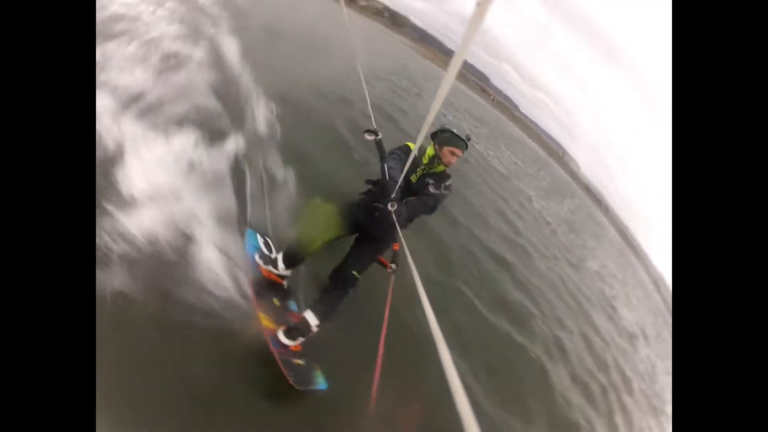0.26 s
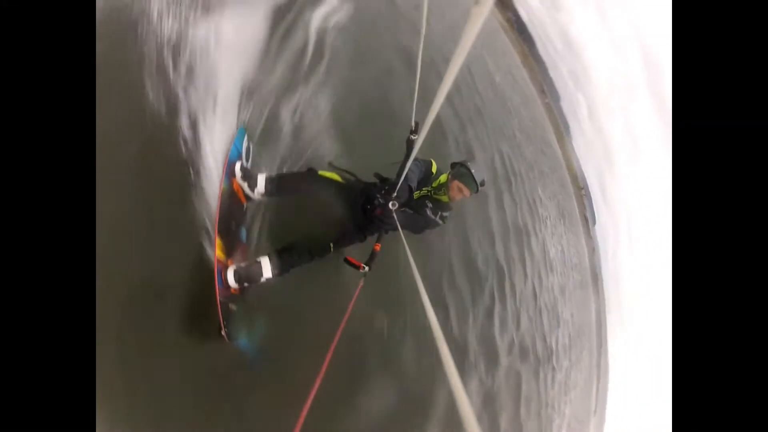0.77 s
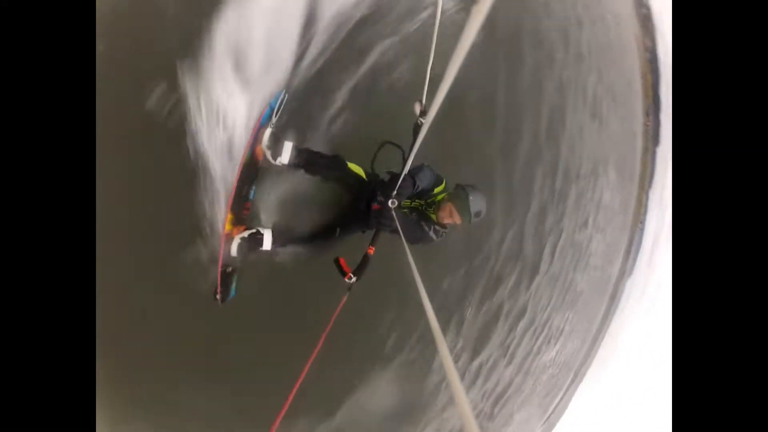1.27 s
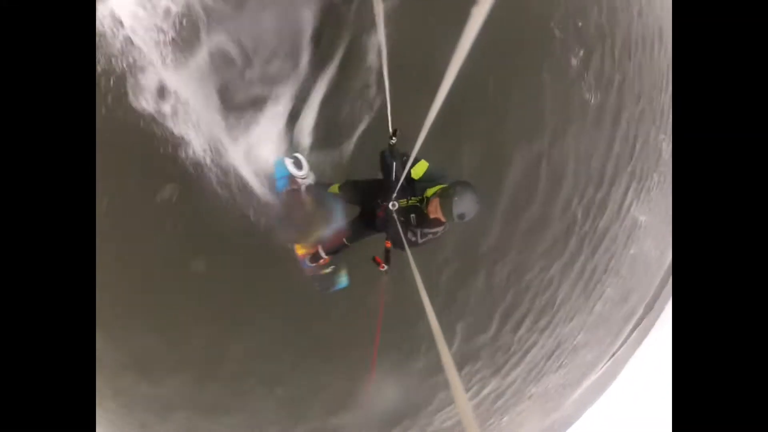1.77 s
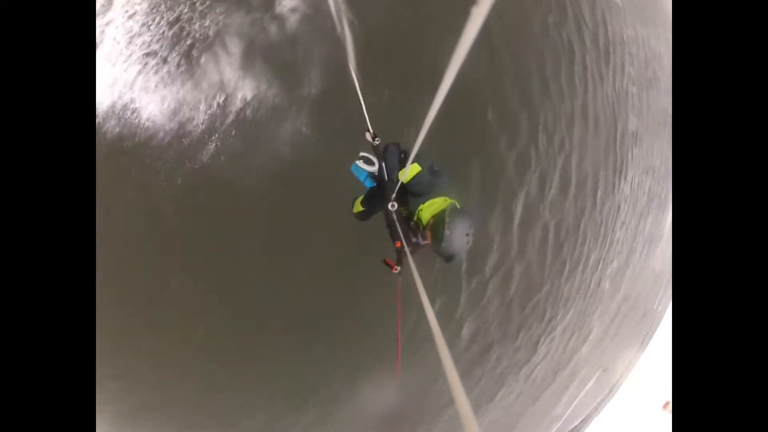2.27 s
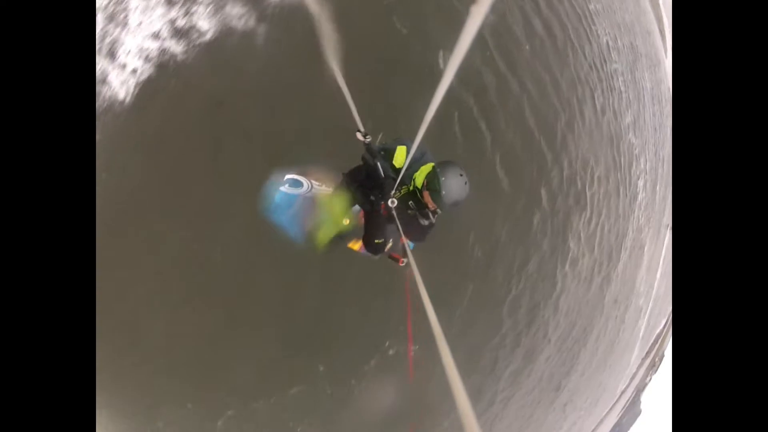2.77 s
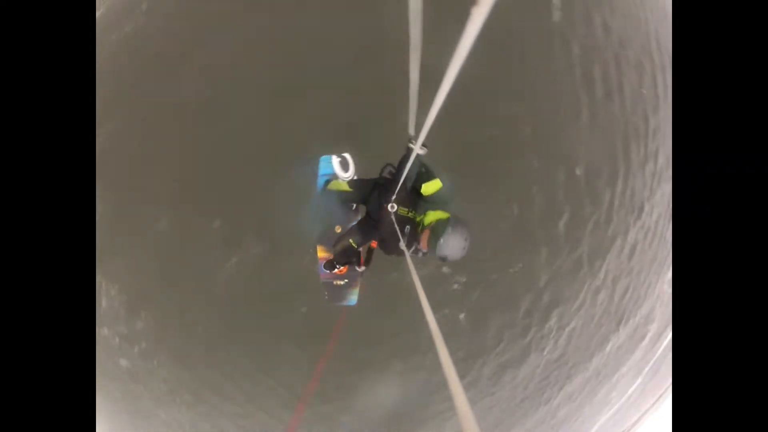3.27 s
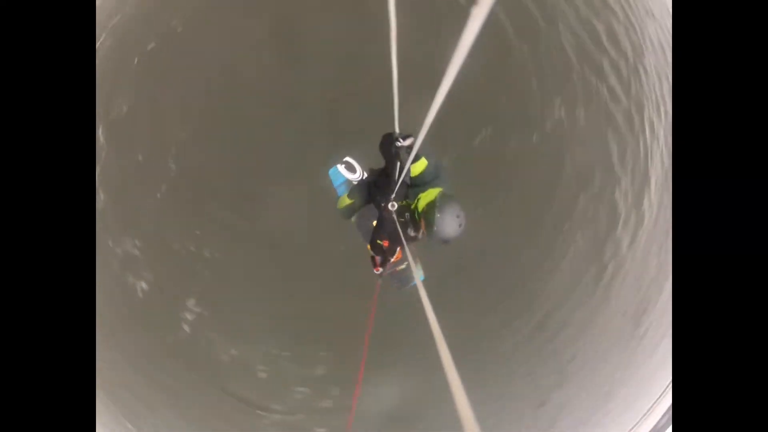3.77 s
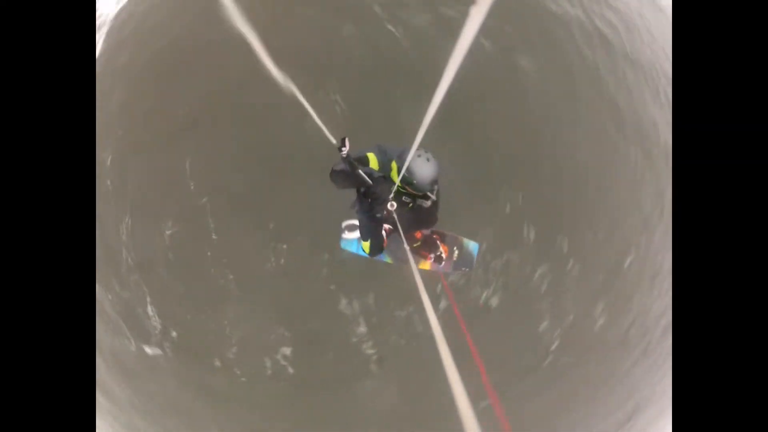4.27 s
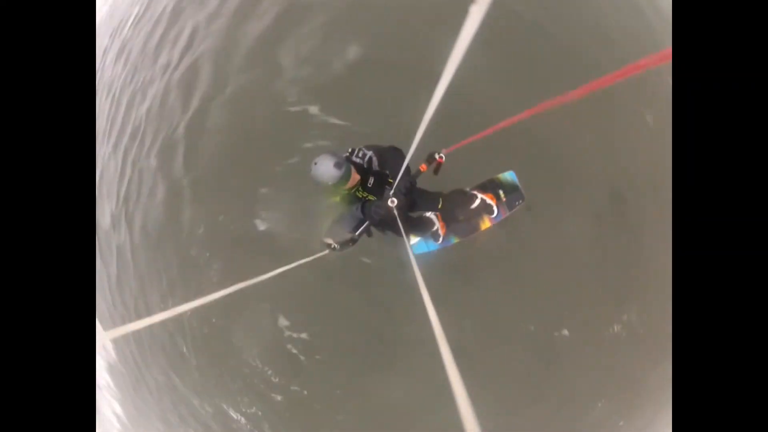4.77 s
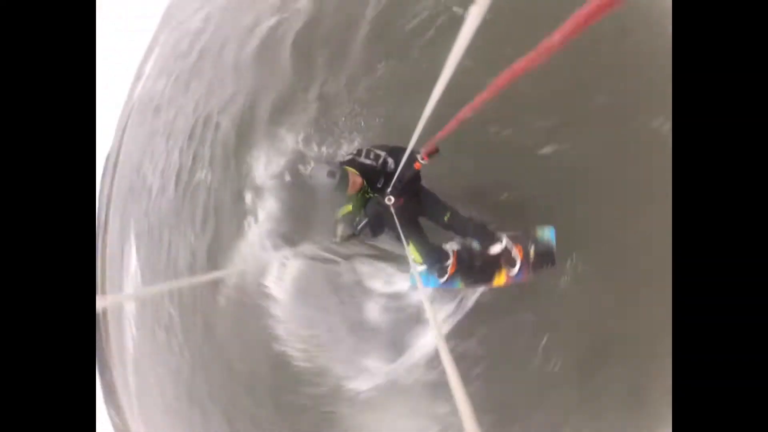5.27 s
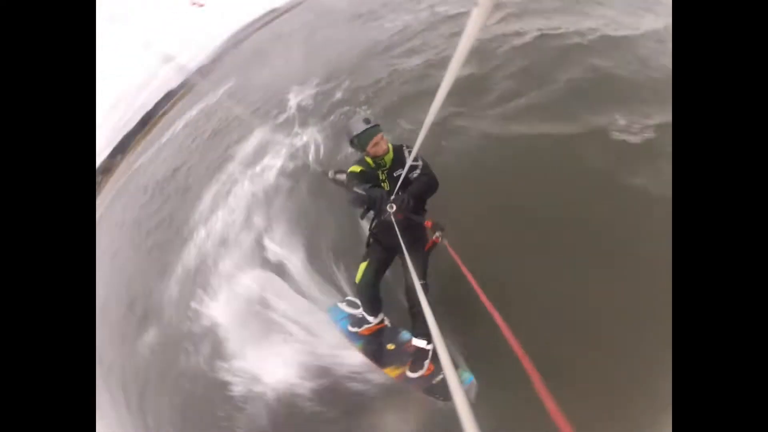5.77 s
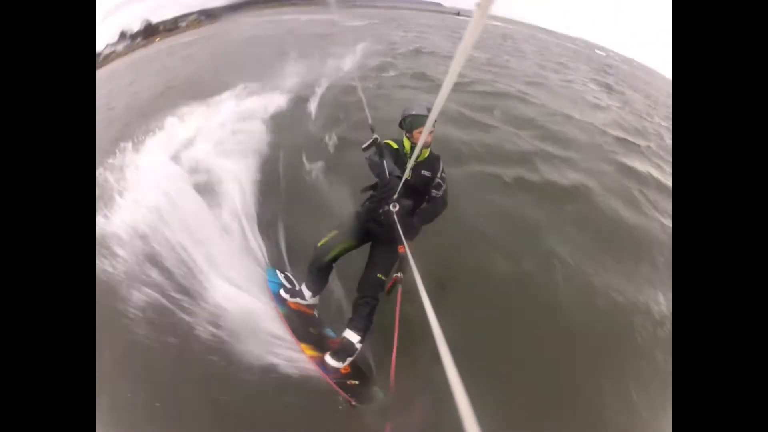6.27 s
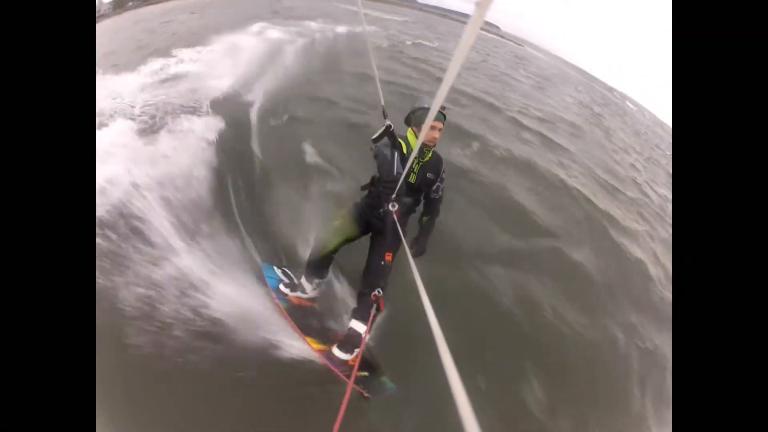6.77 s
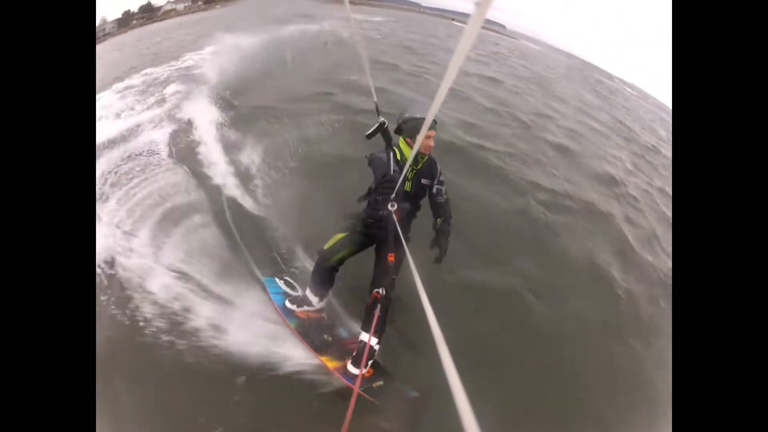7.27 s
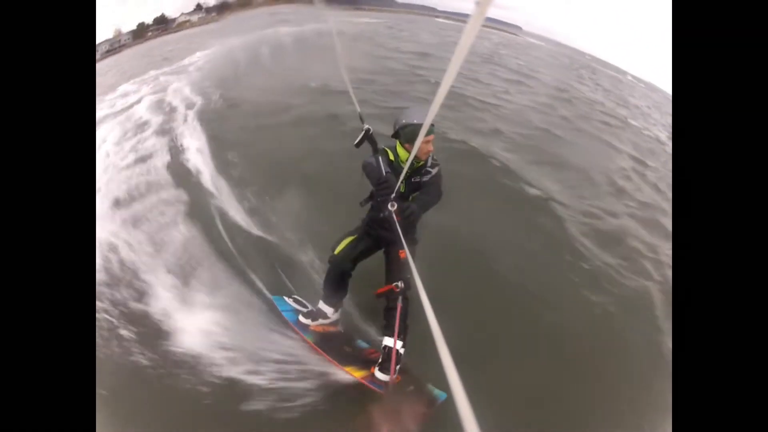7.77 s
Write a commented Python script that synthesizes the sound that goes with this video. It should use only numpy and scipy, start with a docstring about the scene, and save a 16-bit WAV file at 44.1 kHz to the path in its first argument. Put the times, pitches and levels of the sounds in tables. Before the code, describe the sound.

A fluttering, howling whistle of wind through kite lines rises and falls, broken by thumps, clicks and light splashes from a board.

```python
"""On choppy water, a small camera hangs in the kite lines as a kiteboarder planes, jumps, lands, rides on.
The taut lines shed vortices and whistle in the airflow, the main sound. The rig knocks and clicks,
wind rumbles on the housing, and the board throws hissing spray. The camera ducks after the hardest
knocks, and its coarse sampling mirrors the whistle into a thin treble sizzle."""
import sys
import numpy as np
from scipy import signal
from scipy.fft import rfft, irfft, next_fast_len
from scipy.io import wavfile
from scipy.ndimage import map_coordinates

SR = 44100
rng = np.random.default_rng(int(sys.argv[2]) if len(sys.argv) > 2 else 0)


def unload_wav(signal):
    """Save mono or channel-first audio to the path in sys.argv[1] as 16-bit WAV at rate SR, clipped to [-1, 1]."""
    wavfile.write(
        sys.argv[1],
        SR,
        np.round(np.clip(np.atleast_2d(signal).T, -1, 1) * 32767).astype(np.int16),
    )


N = 353241
TIME_S = np.arange(N) / SR

# Whistle range, higher and wider at take-off and landing: time_s, slow_pitch_hz, fast_pitch_hz
WHISTLE_RANGE = [(0.0, 888, 1086), (0.5, 839.3, 1047), (1.1, 872.5, 1094), (1.5, 903, 1426),
                 (1.72, 1054, 1579), (2.05, 899.8, 1264), (2.88, 804.5, 960.2), (3.25, 817.6, 1087),
                 (3.62, 834, 1036), (3.87, 864.6, 1313), (4.4, 865, 1353.0), (4.87, 1049, 1531),
                 (5.15, 867.7, 1440), (5.6, 925.3, 1332), (6.3, 628.6, 1053), (6.9, 764.7, 958.7),
                 (7.45, 916.0, 1083), (8.0, 974.0, 1170)]
# Stretches of line: position (0 slow, 1 fast), relative_db
STRETCHES = [(-.45, -13.5), (-.05, -2), (.08, 0.5), (.3, 2), (.52, 0.5), (.7, -3), (.88, -1.5),
             (1.05, -2.5), (1.4, -8)]
# Lines slacken at the top of the jump and on landing: start_s, end_s, fade_s, return_s, depth_db
SLACKS = [(2.914, 3.49, 0.23, 0.1, 2), (4.908, 5.19, 0.021, 0.026, 2), (5.197, 5.43, 0.023, 0.073, 5),
          (5.492, 5.627, 0.05, 0.03, 3), (5.61, 6.782, 0.5, 0.18, 18.5)]
# Toneless rush under the whistle: freq_hz, density_db
RUSH_SPECTRUM = [(400, -21.5), (750, -16.5), (1100, 0.5), (1600, -7.5), (2150, -9), (2500, -17.5),
                 (2800, -18), (3200, -21.5), (3700, -20.5), (4400, -38), (6000, -53)]
# Camera body's response to line vibration: freq_hz, gain_db
BODY_RESPONSE = [(400, -7.5), (650, 5), (900, 4), (1550, 3.5), (1900, -1.5), (2250, -1.5), (2450, -6.5),
                 (2750, -2), (3200, -7.5), (3700, -6.5), (4400, -11.5), (4900, -17), (6000, 4)]


def lines(taut_db=-23.5, resonance_hz=2110, resonance_width_hz=540):
    """Stretches at different airspeeds sing together: narrow when steady, a howl as the kite swings."""
    slow_hz, fast_hz = curves(WHISTLE_RANGE)
    spread_oct = np.log2(fast_hz / slow_hz)
    speed_oct = np.log2(fast_hz / fast_hz.min())
    chorus = np.zeros(N)
    for position, db in STRETCHES:
        pitch_hz = slow_hz * 2 ** (position * spread_oct)
        # overtones peak in even flow, with the octave on the rig's resonance
        detuning = (2 * pitch_hz - resonance_hz) / resonance_width_hz
        overtone_gain = amp(-0.5 - 2.5 * spread_oct) / np.hypot(1, detuning)
        chorus += amp(db) * vortex_tone(pitch_hz, overtone_gain)
    rush = amp(-21 + 6.5 * speed_oct + 20.5 * spread_oct) * noise(RUSH_SPECTRUM)
    slack_db = np.zeros(N)
    for start_s, end_s, fade_s, return_s, depth_db in SLACKS:
        ramp = np.minimum((TIME_S - start_s) / fade_s, (end_s - TIME_S) / return_s)
        slack_db += depth_db * np.clip(ramp, 0, 1)
    gust_db = 1.28 * wobble(16) + 0.67 * wobble(90)
    return amp(taut_db - slack_db + gust_db) * coloured(unit(chorus) + rush, BODY_RESPONSE)


# Vortex-shedding overtones, before overtone_gain: harmonic, relative_db
OVERTONES = [(2, -13), (3, -39), (4, -41.5)]


def vortex_tone(pitch_hz, overtone_gain, drift=0.009, blur_hz=27, flutter_hz=70):
    """A line sheds vortices at a rate set by airspeed; turbulence blurs the tone and makes it flutter."""
    hz = pitch_hz * (1 + drift * wobble(14)) + blur_hz * wobble(200)
    phase = 2 * np.pi * np.cumsum(hz) / SR
    overtones = sum(amp(db) * np.cos(round(k) * phase) for k, db in OVERTONES)
    flutter = np.hypot(wobble(flutter_hz), wobble(flutter_hz))
    return unit((np.cos(phase) + overtone_gain * overtones) * flutter)


# Single-line whistles: start_s, length_s, start_hz, end_hz, level_db, overtone_gain_db
SOLOS = [(0.578, 0.27, 917, 935, -32, 4.5), (1.621, 0.12, 1470, 1760, -29, -15),
         (2.884, 0.67, 745, 660, -35.5, 2), (3.051, 0.43, 1011, 1060, -29.5, -6),
         (3.039, 0.35, 1140, 1180, -32.5, -8), (3.8, 0.41, 1094, 1168, -30, -0.5),
         (4.319, 0.6, 1146, 1330, -30.5, -9), (4.776, 0.172, 1440, 1530, -29.5, -13),
         (6.669, 1.45, 765, 1052, -28, 0.5)]


def solo_lines():
    """One line sings out of the chorus, its pitch easing to that of its new airspeed."""
    track = np.zeros(N)
    for start_s, length_s, start_hz, end_hz, db, overtone_gain_db in SOLOS:
        glide = np.sin(np.pi / 2 * np.clip((TIME_S - start_s) / length_s, 0, 1))
        pitch_hz = start_hz + (end_hz - start_hz) * glide
        tone = vortex_tone(pitch_hz, amp(overtone_gain_db), drift=0.012, blur_hz=28.26)
        track += bursts([(start_s, length_s, db)], edge_s=0.045) * tone
    return track


# Jolts of the rig: start_s, level_db, pitch_ratio
KNOCKS = [(0.8653, -15, 1.67), (1.8194, 14, 1.18), (1.8242, 16.5, 0.97), (2.6615, -7.5, 0.96),
          (4.794, -10.5, 1.387), (5.746, -1.5, 1.05), (6.0586, -7, 1.277), (6.192, -16, 0.96),
          (6.4363, -11, 1.4)]
# Camera mount modes: base_hz, relative_db, t60_s
MOUNT_MODES = [(124, -10, 0.11), (210.3, 3.5, 0.029), (312, -2.5, 0.023), (481, -27, 0.049)]
# Fittings and drops hitting the housing: start_s, level_db
CLICKS = [(2.1454, -25.5), (2.208, -24), (2.939, -36.5), (3.7304, -32.5), (4.5815, -23), (4.687, -9),
          (4.794, -5), (5.1986, -22.5), (5.272, -33), (5.4026, -29), (5.489, -13.5)]
# Housing modes: base_hz, relative_db, t60_s
HOUSING_MODES = [(1450, 3.5, .016), (2330, 13, 0.011), (2970, -4.5, 0.014), (3620, -3, 0.031),
                 (4600, -9, 0.0092)]


def rig(knock_rise_s=0.0007, crack_t60_s=0.015):
    """Jolts thump through the light mount, with little deep bass under them; hard contacts ring the housing."""
    track = np.zeros(N)
    t = np.arange(SR // 6) / SR
    onset = 1 - np.exp(-(t / knock_rise_s) ** 2)
    for start_s, db, pitch_ratio in KNOCKS:
        add(track, start_s, amp(db) * ring(MOUNT_MODES, t, pitch_ratio) * onset)
    for start_s, db in CLICKS:
        crack = 0.1 * amp(-60 * t / crack_t60_s) * rng.standard_normal(len(t))
        add(track, start_s, amp(db) * (ring(HOUSING_MODES, t, pitch_ratio=0.89) + crack))
    return signal.sosfilt(signal.butter(2, 65, "highpass", fs=SR, output="sos"), track)


# Wind on the housing: time_s, level_db
WIND_LEVEL = [(0.0, -48.5), (0.7, -41.5), (1.6, -29), (2.1, -40), (2.8, -41.5), (3.3, -35.5), (3.6, -39),
              (3.9, -31.5), (4.15, -36), (4.8, -31), (5.8, -30.5), (6.25, -35.5), (6.6, -29.5),
              (7.15, -40.5), (8.0, -48.5)]
# Buffets before take-off and around the landing: start_s, length_s, level_db
BUFFETS = [(1.69, 0.026, -30), (4.852, 0.03, -23.5), (5.357, 0.064, -14.5), (5.541, 0.049, -22),
           (5.585, 0.068, -19), (5.752, 0.036, -26.5), (6.425, 0.061, -28.5), (6.859, 0.096, -28.5)]
# Wind spectra: freq_hz, density_db
RUMBLE_SPECTRUM = [(20, -17), (45, -16), (80, -8.5), (125, -0.5), (185, -0.5), (320, -8.5), (425, -18.5),
                   (500, -12), (590, -20.5), (1000, -12), (2500, -41), (5000, -75)]
BUFFET_SPECTRUM = [(25, -55), (70, -6), (120, 5), (200, -1.5), (330, -12), (600, -22.5), (1500, -52)]


def wind():
    """Eddies rumble on the housing, with a few heavy buffets."""
    level_db, = curves(WIND_LEVEL)
    rumble = amp(level_db + 1.88 * wobble(15) + 2.3 * wobble(50)) * noise(RUMBLE_SPECTRUM)
    return rumble + bursts(BUFFETS, edge_s=0.027) * noise(BUFFET_SPECTRUM)


# Landing splashes and wave slaps: start_s, length_s, level_db
SPLASHES = [(4.695, 0.22, -38.5), (4.9, 0.22, -38.5), (5.035, 0.047, -37.5), (5.185, .05, -34.5),
            (5.32, .13, -35), (5.485, 0.038, -36.5), (5.55, 0.12, -41)]
SLAPS = [(4.86, 0.014, -26), (5.192, 0.0146, -25.5), (6.43, 0.012, -23)]
# Their spectra: freq_hz, density_db
SPLASH_SPECTRUM = [(300, -3), (1000, -9.5), (2200, 4.5), (2500, -7), (2900, -8.5), (3500, -9.5),
                   (4400, -24), (5000, -15.5), (6000, -16.5)]
SLAP_SPECTRUM = [(300, 11), (600, -11), (1000, -6), (1500, 6), (2000, -25), (5000, -27.5)]


def board_impacts():
    """The board splashes down and slaps the chop."""
    splash_gain = bursts(SPLASHES, edge_s=0.011) * amp(2.1 * wobble(54))
    splashes = splash_gain * water(SPLASH_SPECTRUM, drops_per_s=120, patter=0.59)
    return splashes + bursts(SLAPS, edge_s=0.0021) * noise(SLAP_SPECTRUM)


# Spray, faint in the jump, loudest in the carve: time_s, level_db
FAN_LEVEL = [(0.0, -59), (0.6, -52.5), (1.3, -60.5), (1.75, -55.6), (2.25, -56.5), (2.85, -64),
             (3.3, -59.3), (3.6, -62.5), (4.65, -62.5), (4.8, -53), (5.25, -56), (6.3, -50), (6.85, -47.5),
             (7.15, -56), (7.7, -62.7), (8.0, -60)]
# Edge digs in: start_s, length_s, level_db
SWISHES = [(6.57, 0.17, -40), (6.87, .14, -36.5)]
# Spray spectra: freq_hz, density_db
FAN_SPECTRUM = [(200, -15.5), (600, 7), (1200, 4.5), (1600, -6.5), (2300, 9), (3200, 0), (3800, 11.5),
                (4400, -0.5), (4950, 3), (5500, -0.5), (6000, -6)]
SWISH_SPECTRUM = [(500, -5), (1500, 18.5), (2200, 7), (3200, -1), (3800, 2), (4350, 0), (4900, 8),
                  (5400, -7.5), (6000, -17)]


def spray():
    """The board's edge throws a hissing fan that sizzles when it digs in."""
    level_db, = curves(FAN_LEVEL)
    fan = amp(level_db + 2.3 * wobble(45)) * water(FAN_SPECTRUM, drops_per_s=310, patter=0.36)
    swish_gain = bursts(SWISHES, edge_s=0.044) * amp(0.72 * wobble(45))
    return fan + swish_gain * water(SWISH_SPECTRUM, drops_per_s=210, patter=0.51)


# Drop ticks: freq_hz, density_db
DRIP_SPECTRUM = [(1000, -11), (2500, -9.5), (3700, -5), (4300, -8), (5000, 5), (6000, 1)]


def drips(drops_per_s=9, level_db=-74):
    """Stray drops tick faintly on the camera."""
    ticks = (rng.random(N) < drops_per_s / SR) * rng.uniform(0.3, 1, N)
    return amp(level_db) * coloured(ticks, DRIP_SPECTRUM)


def water(spectrum, drops_per_s, patter):
    """Fine spray with single droplets pattering in it, at rms 1."""
    droplets = (rng.random(N) < drops_per_s / SR) * rng.standard_normal(N)
    return coloured(rng.standard_normal(N) + patter * unit(droplets), spectrum)


def amp(db):
    return 10 ** (np.asarray(db) / 20)


def unit(x):
    """x at rms 1."""
    return x / np.sqrt(np.mean(np.abs(x) ** 2) + 1e-20)


def curves(rows):
    """One value per sample for each column after time_s."""
    time_s, *columns = np.transpose(rows)
    return [np.interp(TIME_S, time_s, column) for column in columns]


def bursts(rows, edge_s):
    """Gain of (start_s, length_s, level_db) bursts; each ramp lasts 2 * edge_s."""
    gain = np.zeros(N)
    for start_s, length_s, db in rows:
        end_s = start_s + length_s
        corners_s = [start_s - edge_s, start_s + edge_s, end_s - edge_s, end_s + edge_s]
        gain += amp(db) * np.interp(TIME_S, corners_s, [0, 1, 1, 0])
    return gain


def wobble(knots_per_s):
    """Smooth random curve, rms near 1."""
    coarse_s = TIME_S[::16]
    knots = rng.standard_normal(8192)
    return np.interp(TIME_S, coarse_s, map_coordinates(knots, [coarse_s * knots_per_s], mode="wrap"))


def filtered(x, response):
    """x through the zero-phase gain response(hz)."""
    size = next_fast_len(N + 8192)
    return irfft(rfft(x, size) * response(np.fft.rfftfreq(size, 1 / SR)), size)[:N]


def coloured(x, spectrum):
    """x shaped by (freq_hz, gain_db) points, at rms 1."""
    hz, db = np.transpose(spectrum)
    return unit(filtered(x, lambda f: amp(np.interp(np.log(f + 1), np.log(hz), db))))


def noise(spectrum):
    """Shaped noise at rms 1."""
    return coloured(rng.standard_normal(N), spectrum)


def ring(modes, t, pitch_ratio):
    """Struck modes decaying at base_hz * pitch_ratio, at peak 1."""
    wave = sum(amp(db - 60 * t / t60_s) * np.sin(2 * np.pi * base_hz * pitch_ratio * t)
               for base_hz, db, t60_s in modes)
    return wave / np.abs(wave).max()


def add(track, start_s, sound):
    """Mix sound into track at start_s."""
    part = track[max(0, round(start_s * SR)):][:len(sound)]
    part += sound[:len(part)]


def scene():
    """All sources at one microphone."""
    mono = lines() + solo_lines() + rig() + wind() + board_impacts() + spray() + drips()
    return np.array([mono, mono])


def gain_control(x, threshold_db, release_db_per_s, lag_s, attack_s):
    """Peaks over the threshold pull the gain down after a lag; it climbs back steadily."""
    over_db = np.maximum(20 * np.log10(np.abs(x) + 1e-9) - threshold_db, 0)
    climb_db = release_db_per_s * TIME_S
    cut_db = np.maximum.accumulate(over_db + climb_db) - climb_db
    late_cut_db = np.interp(TIME_S - lag_s, TIME_S, cut_db)
    pole = np.exp(-1 / (attack_s * SR))
    return x * amp(-signal.lfilter([1 - pole], [1, -pole], late_cut_db))


def record(dry, hold_hz=12000, antialias_hz=5950, rolloff_hz=15300, top_hz=15680):
    """The camera ducks, samples coarsely and clips; its held steps mirror the sound around hold_hz."""
    ducked = gain_control(dry[0], threshold_db=-5.0, release_db_per_s=59, lag_s=0.0024, attack_s=0.0037)
    band_limited = filtered(ducked, lambda hz: 1 / (1 + (hz / antialias_hz) ** 80))
    coarse = signal.resample_poly(band_limited, hold_hz, SR, window=("kaiser", 3))
    clipped = np.clip(coarse, -0.5, 0.5)
    held = signal.resample_poly(np.repeat(clipped, 4), SR, 4 * hold_hz)[:N]
    out = filtered(held, lambda hz: (hz < top_hz) / (1 + (hz / rolloff_hz) ** 80))
    return np.array([out, out])


dry = scene()
out = record(dry)
unload_wav(out)
```